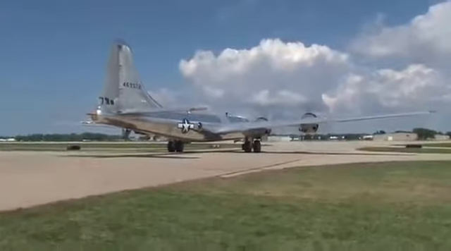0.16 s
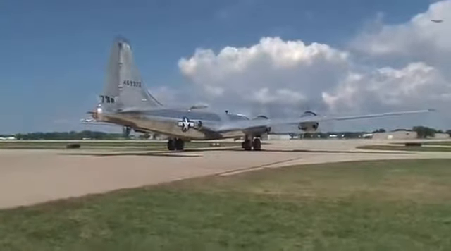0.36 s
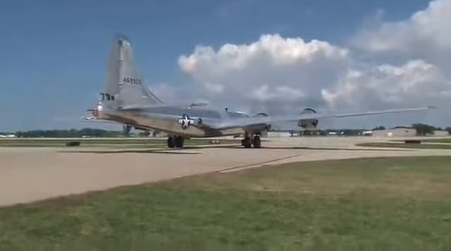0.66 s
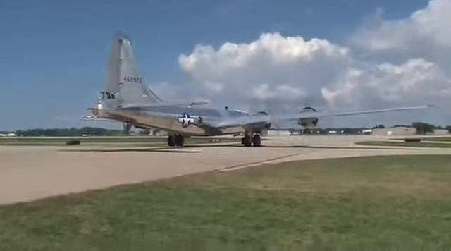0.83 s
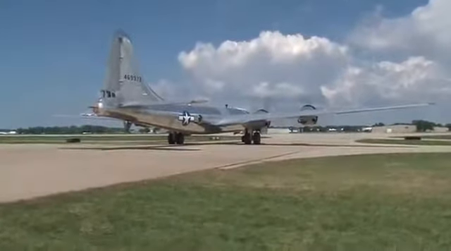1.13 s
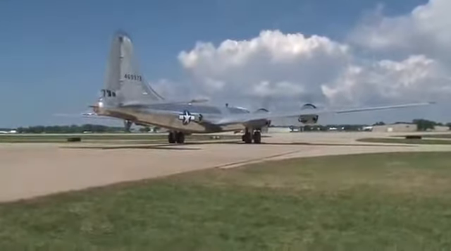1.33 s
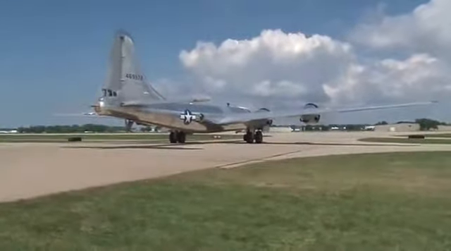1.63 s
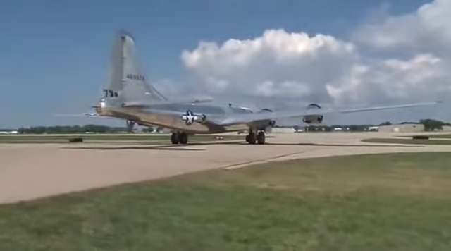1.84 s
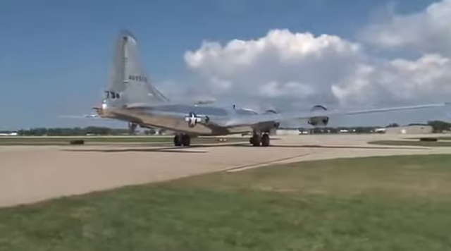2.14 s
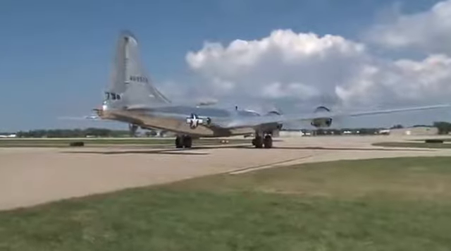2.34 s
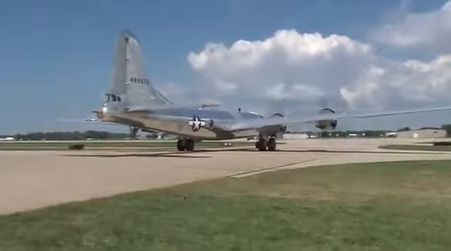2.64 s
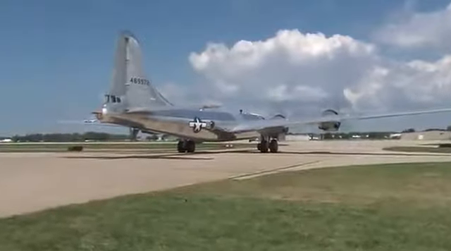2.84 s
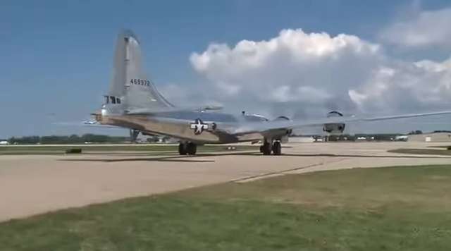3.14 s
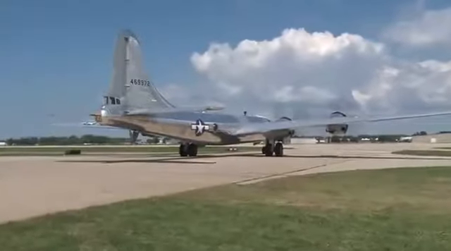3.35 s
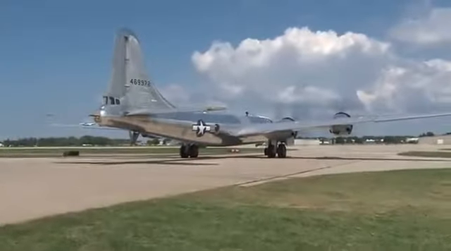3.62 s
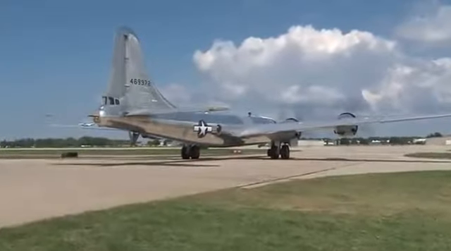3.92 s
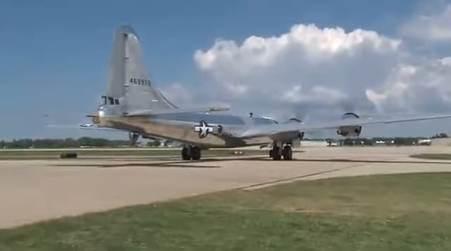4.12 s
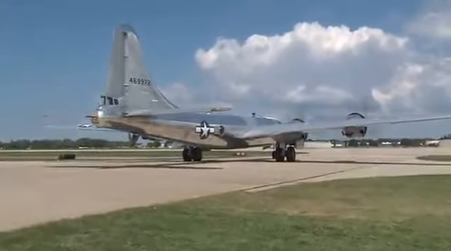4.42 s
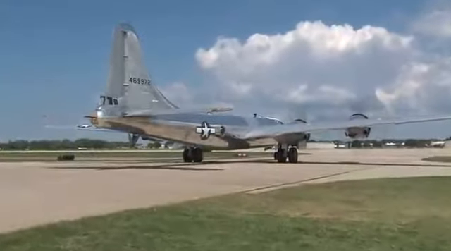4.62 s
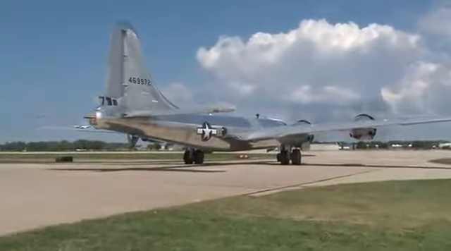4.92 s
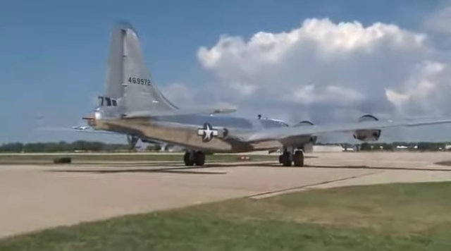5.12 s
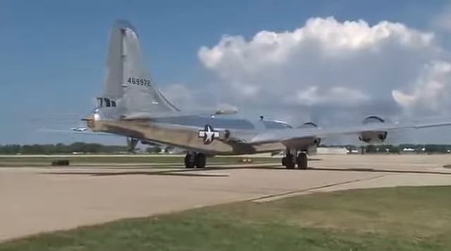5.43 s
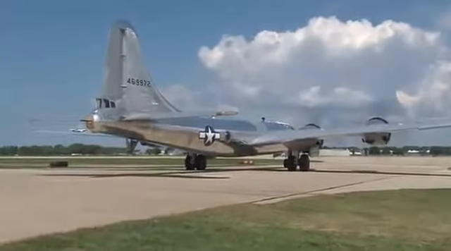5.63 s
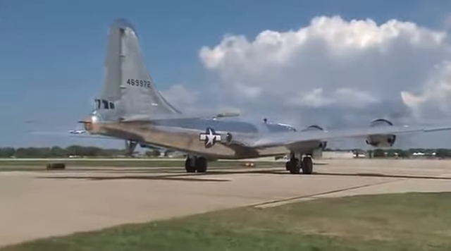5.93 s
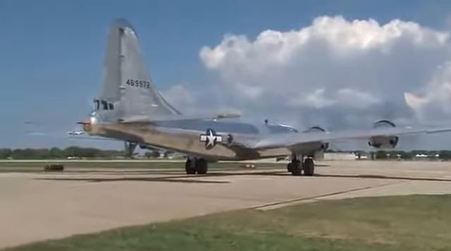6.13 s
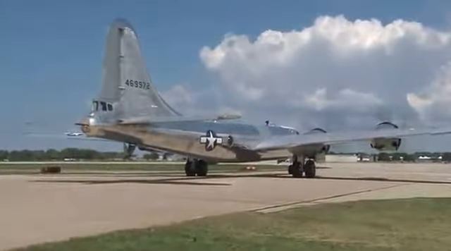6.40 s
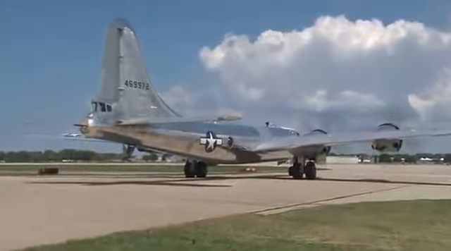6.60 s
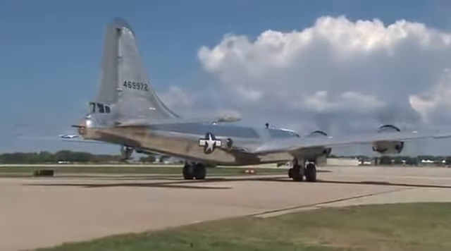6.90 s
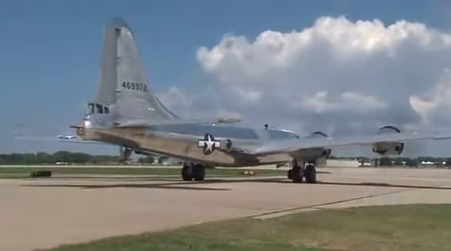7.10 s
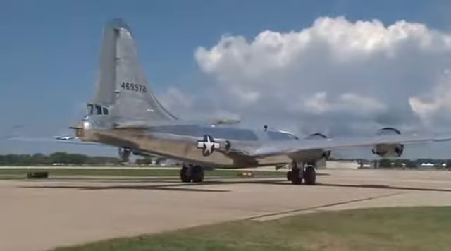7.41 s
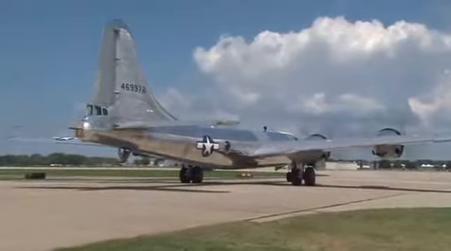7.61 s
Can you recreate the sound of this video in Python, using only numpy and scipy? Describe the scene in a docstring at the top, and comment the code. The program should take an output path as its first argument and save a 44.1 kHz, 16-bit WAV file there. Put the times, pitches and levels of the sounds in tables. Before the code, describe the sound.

Outdoors on an airfield, a big four-engine propeller plane taxis nearby. Violent wind and propeller wash slam a stereo microphone, giving dense, clipped low thumps from start to end. Behind them a steady low engine drone and noisy rasp stutter through the gaps, surging in the first half, with a clearer hollow growl just before four seconds, then growing duller.

```python
"""Four radial piston engines of a taxiing aircraft roar: firing pulses carry the bass, blade-chopped noise the treble.
Rasping surges and a swelling low growl are shaped from the same kind of chopped noise;
a wandering hollow ring of slow noise on a gliding carrier joins the surges.
Propeller wash buffets two microphone capsules: its pressure drives each preamp into its rails, so the roar
is chopped into bursts between thumps, which sag back to zero through the coupling capacitors."""
import sys
import numpy as np
from scipy import signal
from scipy.fft import rfft, irfft
from scipy.io import wavfile
from scipy.ndimage import uniform_filter1d

SR = 44100
rng = np.random.default_rng(int(sys.argv[2]) if len(sys.argv) > 2 else 0)


def output_pcm(signal):
    """Save a mono or channel-first signal as 16-bit PCM at the path in sys.argv[1].

    Samples are clipped to [-1, 1] before scaling.
    """
    pcm = np.clip(np.atleast_2d(signal).T, -1, 1) * 32767
    wavfile.write(sys.argv[1], SR, np.round(pcm).astype(np.int16))


N = 342039

# growl level: (time [s], level [dB])
GROWL_LEVEL = [(0, -26), (0.5, -42.5), (3.3, -48.5), (3.6, -33.5), (4.0, -32), (4.2, -41.5), (5.0, -36.5),
               (5.9, -32), (6.4, -45.5), (7.75, -47)]
# growl spectrum before level setting: (frequency [Hz], relative density [dB per Hz])
GROWL_SPECTRUM = [(60, -50), (200, 5.5), (370, 1), (700, -32), (3000, -90)]

# turbulent pressure on the ports: (frequency [Hz], relative density [dB per Hz])
EDDY_SPECTRUM = [(3, -20), (10, -2), (22, -1.5), (45, -2.5), (90, -12.5), (200, -32.5), (500, -34),
                 (1500, -78.5)]
# long gusts that pin a capsule against a rail: (time [s], length [s], capsules [L, R or LR])
LONG_GUSTS = [(0.131, 0.015, "LR"), (0.156, 0.017, "LR"), (0.175, 0.035, "L"), (0.197, 0.024, "R"),
              (0.325, 0.02, "LR"), (0.424, 0.013, "LR"), (0.493, 0.04, "L"), (0.517, 0.015, "R"),
              (0.564, 0.024, "LR"), (0.594, 0.022, "LR"), (0.886, 0.035, "R"), (1.344, 0.029, "L"),
              (1.548, 0.027, "R"), (1.696, 0.033, "R"), (1.802, 0.028, "L"), (1.999, 0.044, "L"),
              (2.03, 0.015, "R"), (2.218, 0.017, "LR"), (2.326, 0.035, "L"), (2.414, 0.033, "R"),
              (2.433, 0.062, "L"), (2.691, 0.034, "LR"), (2.785, 0.034, "LR"), (2.9, 0.023, "LR"),
              (2.936, 0.034, "R"), (2.99, 0.016, "LR"), (3.097, 0.019, "LR"), (3.188, 0.047, "L"),
              (3.306, 0.011, "LR"), (4.085, 0.039, "L"), (4.2, 0.014, "LR"), (4.224, 0.026, "LR"),
              (4.547, 0.039, "R"), (4.605, 0.033, "R"), (4.846, 0.029, "L"), (4.989, 0.026, "R"),
              (5.186, 0.028, "LR"), (5.447, 0.037, "L"), (5.543, 0.024, "LR"), (5.647, 0.019, "LR"),
              (5.806, 0.0094, "R"), (5.729, 0.037, "R"), (5.791, 0.046, "L"), (6.303, 0.023, "L"),
              (6.952, 0.012, "LR"), (7.08, 0.042, "R"), (7.095, 0.023, "L"), (7.151, 0.042, "L"),
              (7.275, 0.039, "R"), (7.356, 0.04, "R"), (7.374, 0.02, "L"), (7.425, 0.024, "LR"),
              (7.456, 0.046, "L"), (7.557, 0.033, "R"), (7.693, 0.026, "R")]
# timed lulls in the buffeting, brief to long, letting the engines through:
# (time [s], length [s], capsules [L, R or LR])
TIMED_LULLS = [(0.212, 0.017, "R"), (0.29, 0.031, "L"), (0.337, 0.02, "LR"), (0.481, 0.01, "R"),
               (0.628, 0.022, "R"), (0.695, 0.041, "L"), (0.732, 0.04, "R"), (0.796, 0.029, "L"),
               (0.803, 0.068, "R"), (0.936, 0.06, "LR"), (1.047, 0.11, "L"), (1.046, 0.039, "R"),
               (1.114, 0.026, "R"), (1.204, 0.028, "LR"), (1.313, 0.035, "LR"), (1.7, 0.055, "L"),
               (1.83, 0.05, "LR"), (1.95, 0.12, "L"), (2.078, 0.088, "R"), (2.129, 0.075, "L"),
               (2.359, 0.045, "LR"), (2.178, 0.0076, "R"), (2.236, 0.039, "LR"), (2.494, 0.037, "R"),
               (2.551, 0.037, "LR"), (2.602, 0.085, "L"), (2.611, 0.038, "R"), (2.674, 0.018, "R"),
               (2.722, 0.024, "R"), (2.836, 0.047, "L"), (2.846, 0.093, "R"), (3.131, 0.083, "R"),
               (3.317, 0.039, "R"), (3.47, 0.035, "LR"), (3.598, 0.12, "L"), (3.628, 0.39, "R"),
               (3.733, 0.294, "L"), (4.133, 0.022, "L"), (4.265, 0.015, "LR"), (4.303, 0.055, "L"),
               (4.332, 0.043, "R"), (4.39, 0.045, "R"), (4.465, 0.067, "L"), (4.574, 0.079, "L"),
               (4.639, 0.099, "R"), (4.699, 0.12, "L"), (4.753, 0.058, "R"), (4.878, 0.066, "L"),
               (4.915, 0.076, "R"), (5.051, 0.048, "R"), (5.06, 0.051, "L"), (5.116, 0.024, "LR"),
               (5.152, 0.027, "LR"), (5.267, 0.085, "LR"), (5.371, 0.071, "L"), (5.49, 0.063, "L"),
               (5.586, 0.036, "R"), (5.672, 0.024, "LR"), (5.84, 0.06, "LR"), (5.91, 0.25, "R"),
               (5.971, 0.087, "L"), (6.161, 0.07, "L"), (6.19, 0.068, "R"), (6.24, 0.049, "L"),
               (6.328, 0.061, "L"), (6.381, 0.033, "R"), (6.689, 0.072, "L"), (6.761, 0.038, "R"),
               (7.117, 0.04, "LR"), (7.323, 0.03, "L"), (7.452, 0.023, "R"), (7.504, 0.016, "R"),
               (7.569, 0.066, "L"), (7.675, 0.019, "L"), (7.716, 0.03, "LR")]
SLAM_DB, LULL_DB = 11.5, -0.5  # eddy gain re the rail outside lulls; drive into the soft bound inside
GUST_PUSH = 2.5  # gust pressure [rails]
# chance lulls: rate on each capsule, median length, log-length spread
SHORT_LULLS_PER_S, SHORT_LULL_S, SHORT_LULL_SPREAD = 5.5, 0.018, 0.386

# 1-6 kHz rasp level before flares and side offset: (time [s], level [dB])
SURGE_LEVEL = [(0.0, -33.5), (0.15, -46.5), (0.4, -40), (0.75, -37.5), (0.874, -42.5), (1.0, -29),
               (1.125, -41), (1.3, -34.5), (1.5, -49), (1.7, -36), (2.0, -34), (2.375, -37), (2.5, -38.5),
               (2.65, -37), (3.25, -34), (3.4, -34.5), (3.62, -37), (3.75, -31.5), (3.98, -36.5),
               (4.125, -48.5), (4.28, -39), (4.5, -48), (4.8, -44.5), (5.748, -46), (6.5, -50),
               (7.0, -40.5), (7.75, -39.5)]
# rasp spectrum before level setting: (frequency [Hz], relative density [dB per Hz])
SURGE_SPECTRUM = [(200, -26), (450, -0.5), (600, -5), (1000, -4), (2800, -13.5), (4300, -25), (7500, -38),
                  (15000, -50)]
# hollow ring in the surges: (time [s], centre [Hz], gain before the carrier, re the surge [dB])
HOLLOW_RING = [(1.1, 589.3, -9), (1.999, 519.6, -4), (2.4, 1023, -5.5), (2.559, 869.8, 4),
               (2.72, 862.3, 12), (2.9, 852, -1.5), (3.201, 725.4, 0), (3.619, 600, 4.5), (3.9, 620, -4.5)]
# brief flares of rasp and ring: (time [s], length [s], rise before edge smoothing [dB])
SURGE_FLARES = [(2.356, 0.039, 8), (2.672, 0.021, 3), (3.879, 0.03, 5)]

# the four engines: (mean firing rate [Hz], relative pulse level [dB])
ENGINE_FIRINGS = [(91.05, 4.5), (88.15, -5), (89.8, -4), (88.3, -6)]
BLADE_HZ = 39.9  # mean rate of passing blades
# roar colour before level setting: (frequency [Hz], relative density [dB per Hz])
ROAR_SPECTRUM = [(35, -10.5), (60, 0), (224, -8.5), (469, -18.5), (605, -14), (744, -22.5), (1240, -22.5),
                 (4840, -39), (7000, -39), (15000, -58)]
ROAR_DB = -45  # rms from 1 to 6 kHz

RAIL = .123  # preamp output limit [full scale], before the output filters
# high-pass corners of the coupling capacitors: (first [Hz], second [Hz])
COUPLING_CORNERS_HZ = (7.0, 18.0)
TOP_HZ = 15100


def undb(db):
    """Decibels to gain."""
    return 10 ** (np.asarray(db) / 20)


def unit(x):
    """Scale to rms 1."""
    return x / np.sqrt(np.mean(x ** 2))


def level_at(points):
    """Interpolate (s, dB) points over every sample."""
    return np.interp(np.arange(N) / SR, *np.transpose(points))


def colour(x, points):
    """Filter by (Hz, dB) points joined on a log-frequency axis."""
    hz, db = np.transpose(points)
    bins_hz = np.maximum(np.arange(N // 2 + 1) * SR / N, 1)
    gain_db = np.interp(np.log(bins_hz), np.log(hz), db)
    return irfft(rfft(x) * undb(gain_db), N)


def presence(x, db):
    """Set the rms level of the 1-6 kHz band."""
    bandpass = signal.butter(2, (1000, 6000), "band", fs=SR, output="sos")
    band = signal.sosfilt(bandpass, x)
    return x * undb(db) / np.sqrt(np.mean(band ** 2))


def walk(rate_hz):
    """Random levels held 1 / rate_hz, smoothed twice, scaled to rms 1."""
    hold = max(int(SR / rate_hz), 1)
    held = np.repeat(rng.standard_normal(N // hold + 1), hold)[:N]
    return unit(uniform_filter1d(uniform_filter1d(held, hold), hold))


def spans(table, edge_s, values=None):
    """Each row holds its value (1 if none) on its capsules for its length, with ramped edges."""
    out = np.zeros((2, N))
    for k, (start_s, length_s, capsules) in enumerate(table):
        ports = ["LR".index(c) for c in capsules]
        value = 1 if values is None else values[k]
        out[ports, int(start_s * SR):int((start_s + length_s) * SR)] = value
    return uniform_filter1d(out, int(edge_s * SR))


def blade_chopped_noise(alike, blade_db, flicker_db):
    """Noise chopped by passing blades of wandering speed, with flicker; partly shared by both ports."""
    blade_turns = np.cumsum(BLADE_HZ * (1 + 0.026 * walk(2.1))) / SR
    chop = undb(blade_db * np.cos(2 * np.pi * blade_turns) + flicker_db * walk(40))
    shared = alike * rng.standard_normal(N)
    separate = np.sqrt(1 - alike ** 2) * rng.standard_normal((2, N))
    return chop * (shared + separate)


def growl():
    """Rough low-mid noise, chopped by the blades, that swells under the roar."""
    rough = blade_chopped_noise(alike=0.6, blade_db=1.5, flicker_db=3.0)
    return unit(colour(rough, GROWL_SPECTRUM)) * undb(level_at(GROWL_LEVEL))


def short_lulls():
    """Brief lulls that fall at chance moments on one capsule or the other."""
    gap, size, side = rng.random((200, 3)).T
    starts_s = np.cumsum(-np.log(1 - gap)) / (2 * SHORT_LULLS_PER_S)
    log_odds = np.log(size / (1 - size))
    lengths_s = SHORT_LULL_S * np.exp(SHORT_LULL_SPREAD * log_odds / 2)
    return [(s, n, "LR"[int(p < .5)]) for s, n, p in zip(starts_s, lengths_s, side)]


def buffeting(opposed=0.7023):
    """Eddies on the ports: slow ones press one side as they suck the other, small ones are unrelated."""
    slow = colour(rng.standard_normal(N), [(25, -3), (90, -17.0)])
    opposite = slow * np.array([[1], [-1]])
    eddies = opposed * opposite + (1 - opposed) * rng.standard_normal((2, N))
    return unit(colour(eddies, EDDY_SPECTRUM))


def wind_pressure():
    """Wind pressure re the rail: slamming eddies, eased in lulls, displaced by long gusts."""
    directions = np.sign(rng.standard_normal(64))  # rail of each gust
    push = spans(LONG_GUSTS, 0.002, directions)
    lull = spans(TIMED_LULLS + short_lulls(), 0.00235)
    eddies = buffeting()
    # soft bound at 1.25 rails in lulls
    eased = 1.25 * np.tanh(undb(LULL_DB) * eddies)
    eddies = (1 - lull) * undb(SLAM_DB) * eddies + lull * eased
    return (1 - np.abs(push)) * eddies + GUST_PUSH * push


def hollow_ring():
    """Slow noise on a gliding carrier: a wandering band about 200 Hz wide."""
    t = np.arange(N) / SR
    time_s, centre_hz, ring_db = np.transpose(HOLLOW_RING)
    turns = np.cumsum(np.interp(t, time_s, centre_hz)) / SR
    return walk(230) * np.cos(2 * np.pi * turns) * undb(np.interp(t, time_s, ring_db))


def surge(level_db):
    """Blade-chopped rasp that comes in waves and flares, with the hollow ring in it."""
    ring = hollow_ring()
    chopped = blade_chopped_noise(alike=0.79, blade_db=2.2, flicker_db=2.85)
    rasp = presence(colour(chopped, SURGE_SPECTRUM), 0)
    flare_spans = [(s, n, "LR") for s, n, _ in SURGE_FLARES]
    flare_db = spans(flare_spans, 0.0044, [db for *_, db in SURGE_FLARES])
    side_db = np.array([[.8], [-.8]])
    return (rasp + ring) * undb(level_db + flare_db + side_db)


def engine(firing_hz, scatter_db, weak_db):
    """One pulse a firing at a slightly wandering speed; every second firing is weaker on average."""
    firing_count = np.cumsum(firing_hz * (1 + 0.00591 * walk(3))) / SR
    at = np.flatnonzero(np.diff(np.floor(firing_count)))
    scatter = scatter_db * rng.standard_normal(N // 100)[:len(at)]
    alternate = weak_db * (np.arange(len(at)) % 2)
    pulses = np.zeros(N)
    pulses[at] = undb(scatter + alternate)
    return pulses


def roar(firing_db=0.5):
    """Firings carry the bass, rushing gas the treble."""
    engines = [undb(db) * engine(hz, scatter_db=6.0, weak_db=-5.5) for hz, db in ENGINE_FIRINGS]
    thud = colour(unit(sum(engines)), [(250, -2.5), (1500, -14), (6000, -9)])
    gas = blade_chopped_noise(alike=0.86, blade_db=0.95, flicker_db=1.84)
    return presence(colour(gas + undb(firing_db) * thud, ROAR_SPECTRUM), ROAR_DB)


def scene():
    """Engine sound plus wind pressure at the two capsules."""
    return roar() + surge(level_at(SURGE_LEVEL)) + growl() + RAIL * wind_pressure()


def record(dry):
    """Preamps round into their rails, coupling capacitors drop the bass, the top is cut."""
    knee = 2.51
    out = dry / (1 + np.abs(dry / RAIL) ** knee) ** (1 / knee)
    # faint, short noise tail behind the limited sound
    t = np.arange(SR // 20) / SR
    tail = unit(rng.standard_normal(len(t)) * np.exp(-t / 0.019)) / np.sqrt(len(t))
    grit = colour(out, [(250, -34), (700, -5.5), (15000, 4)])
    haze = signal.fftconvolve(grit, tail[None], axes=1)[:, :N]
    out = out + undb(-14.5) * haze
    out = out + undb(-80.0) * rng.standard_normal(out.shape)  # hiss
    for corner_hz in COUPLING_CORNERS_HZ:
        out = signal.lfilter(*signal.butter(1, corner_hz, "high", fs=SR), out)
    lowpass = signal.ellip(8, .2, 70, TOP_HZ, fs=SR, output="sos")
    return signal.sosfilt(lowpass, out)


dry = scene()
out = record(dry)
output_pcm(out)
```